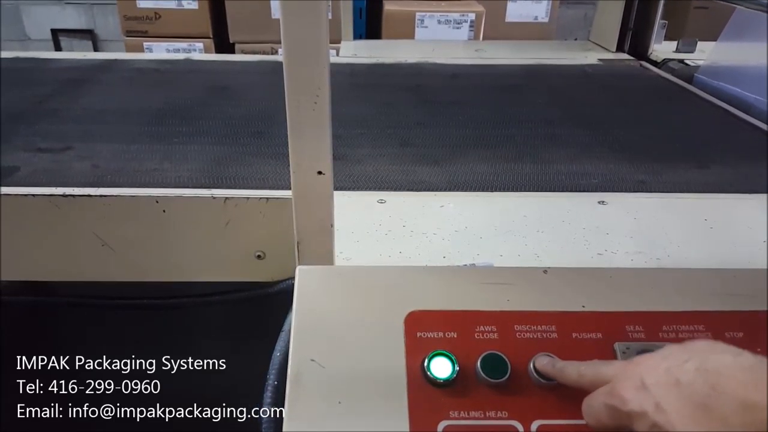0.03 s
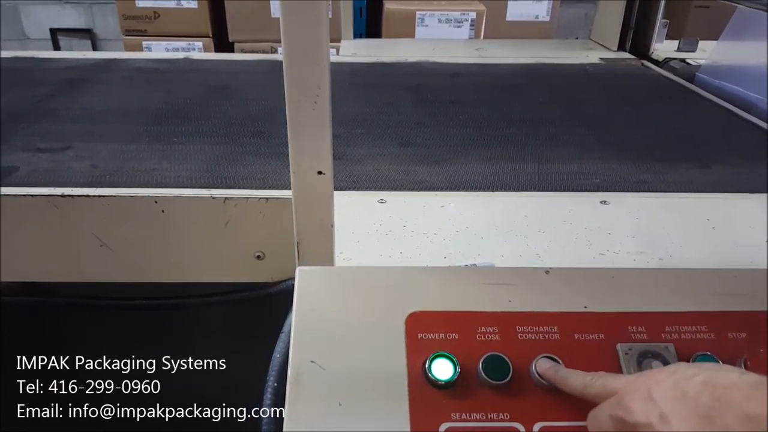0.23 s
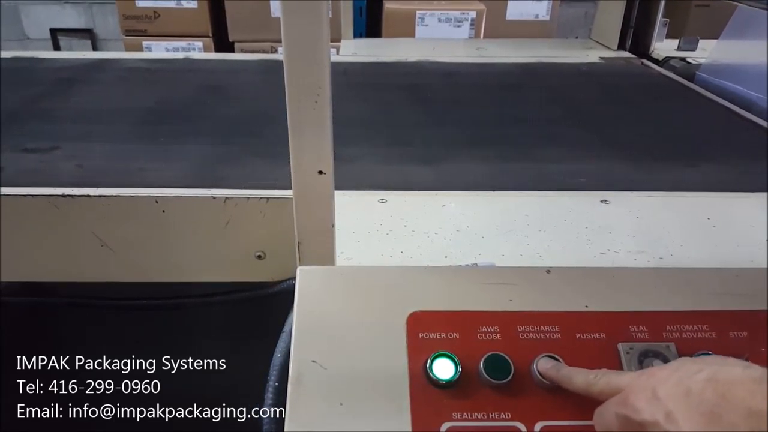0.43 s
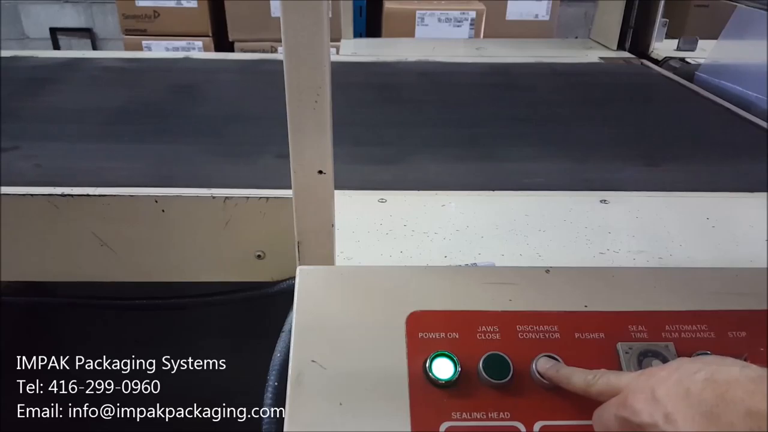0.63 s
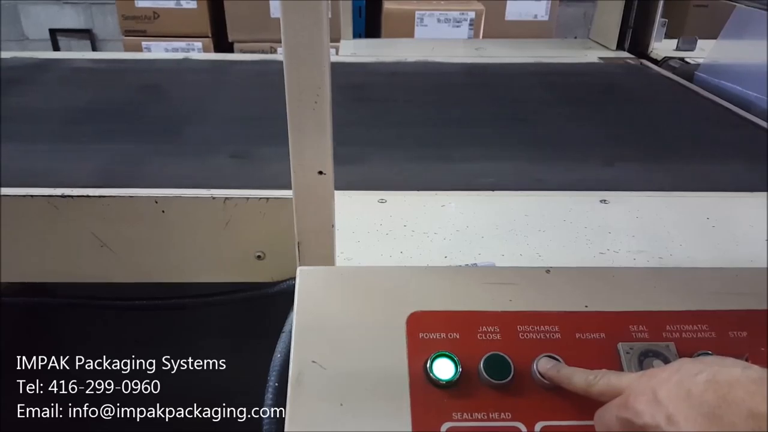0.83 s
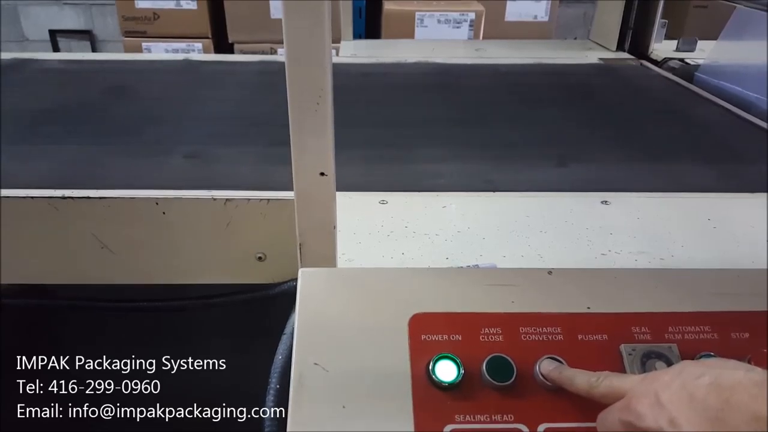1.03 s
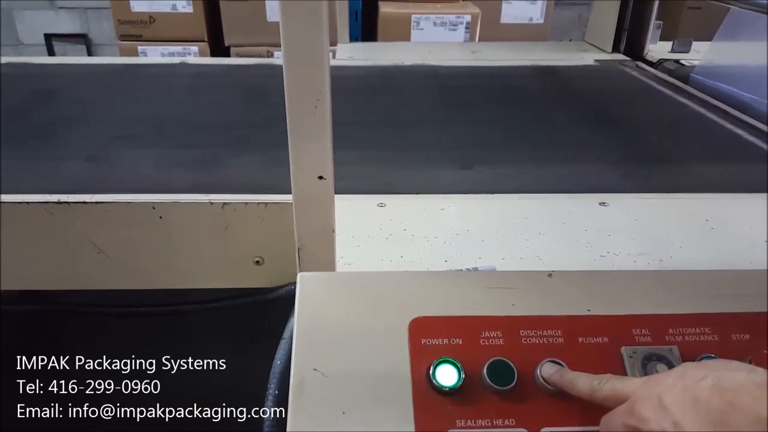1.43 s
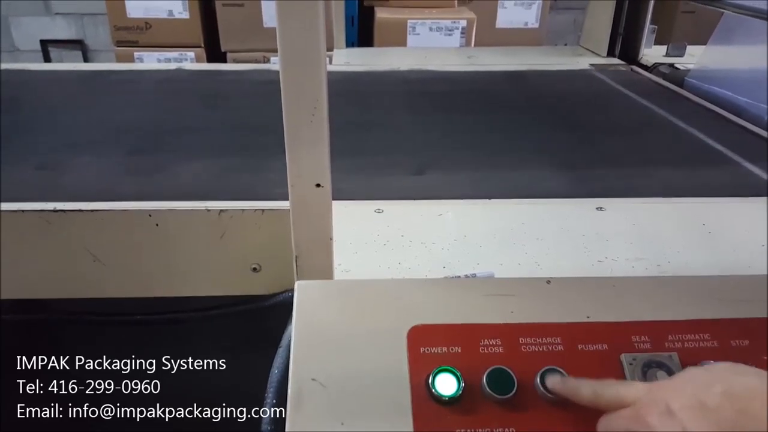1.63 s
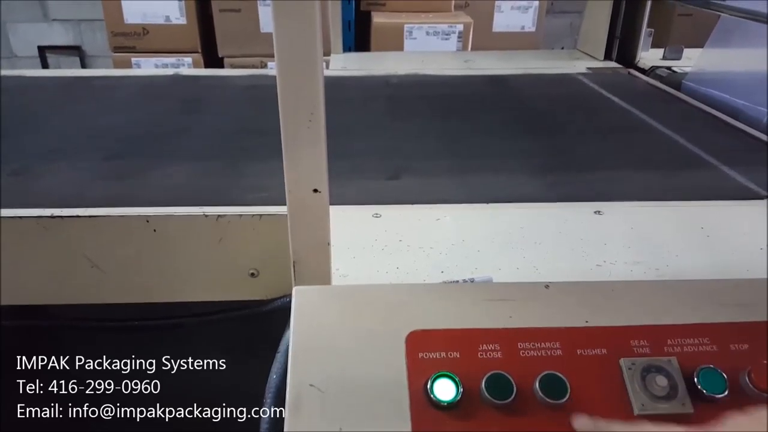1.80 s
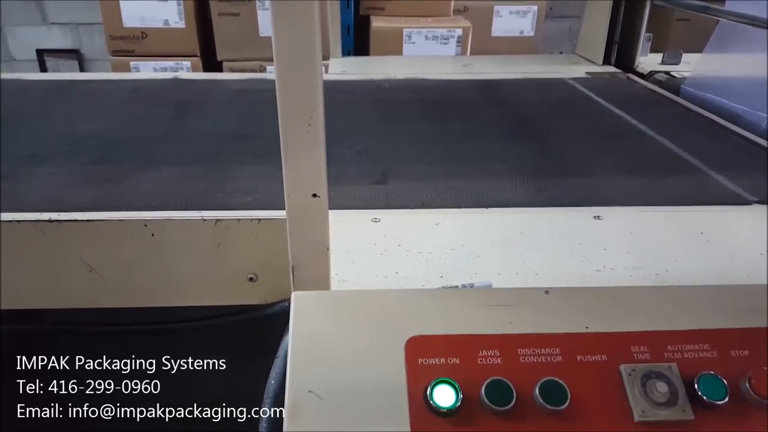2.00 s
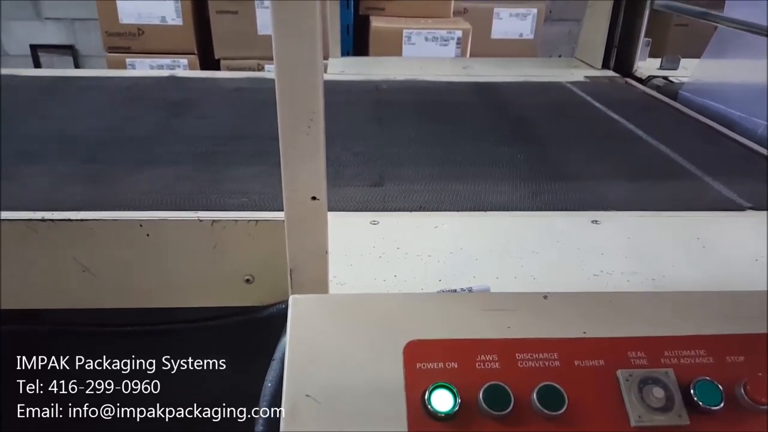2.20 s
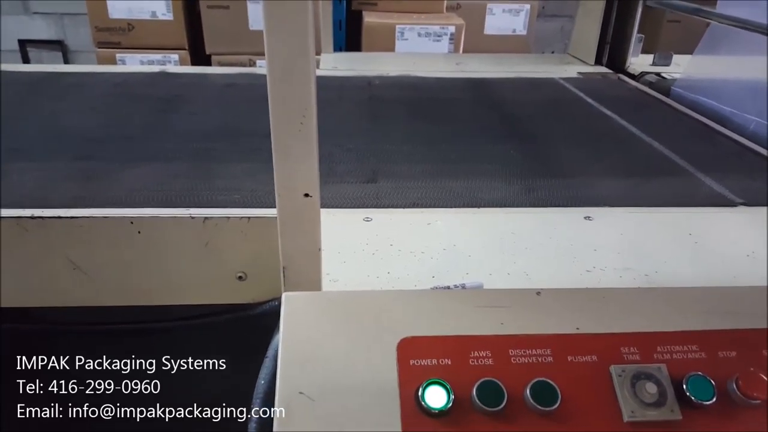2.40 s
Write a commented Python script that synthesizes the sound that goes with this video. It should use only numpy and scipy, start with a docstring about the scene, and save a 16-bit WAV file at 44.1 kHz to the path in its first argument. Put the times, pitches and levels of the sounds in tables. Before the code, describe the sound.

A conveyor belt runs briefly, slightly to the right, over steady workshop air noise and distant fans. At 0.2 seconds a switch thumps in a steel cabinet. From 0.4 the motor hums low and the belt rumbles, with faint gear whine, light repeated rubbing and a bump at 1.5. A second clicking thump at 1.65 cuts the power; the belt coasts with soft bumps, resting by 2.5.

```python
"""Belt conveyor, jogged once

A push button jogs a packaging machine's conveyor in a workshop with air noise and distant fans.
A contactor thumps in the steel cabinet, the motor hums, the gears whine, the belt rumbles and
rubs once per roller turn; a bearing squeals faintly. On release the cabinet thumps again and
the belt coasts to rest with a few soft bumps."""
import sys
import numpy as np
from scipy import signal
from scipy.io import wavfile

SR = 44100
rng = np.random.default_rng(int(sys.argv[2]) if len(sys.argv) > 2 else 0)


def int16_out(signal):
    """Quantize to a 16-bit WAV file."""
    q = np.round(np.clip(np.atleast_2d(signal).T, -1, 1) * 32767)
    wavfile.write(sys.argv[1], SR, q.astype(np.int16))


N = 112454
T = np.arange(N) / SR

# Noise spectra, shape only: f/Hz, density/dB
AIR_SPECTRUM = [(25, -3), (50, 6.5), (80, -4), (130, 1), (200, -1), (290, -18), (400, -12.5), (630, -18),
                (1000, -22), (1600, -23.5), (2500, -29), (4000, -36.5), (8000, -46), (14000, -39.5)]
HISS_SPECTRUM = [(3000, -3.5), (7000, -7), (10500, -9.5), (13000, -12.5), (15500, -3.5), (18000, 13)]
RATTLE_SPECTRUM = [(80, -25), (200, 9.5), (550, 5), (800, -7), (1400, -28.5), (3000, -24.5), (8000, -68)]
RUMBLE_SPECTRUM = [(25, -19), (45, -14.5), (65, 1.5), (90, -14), (125, -3.5), (200, -5.5), (280, -11),
                   (400, -24.5), (700, -42.5)]
ROLLING_SPECTRUM = [(200, -7.5), (400, -3), (620, -0.5), (760, -12), (1050, -5.5), (1500, -18.5),
                    (2300, -18), (2900, -25), (3400, -21.5), (4400, -23.5), (5600, -35.5), (8000, -66),
                    (14000, -34.5)]
RUB_SPECTRUM = [(700, -10), (1100, -5), (1500, -7), (1950, -4), (2550, 1), (3350, -13), (4400, -11),
                (6000, -20), (9000, -32)]
# Stereo images: f/Hz, L-R likeness, L minus R/dB
AIR_STEREO = [(30.5, 0, 23), (64, 0.59, -5), (117, 0.37, -3.5), (212, 0.99, -12), (710, 0.23, -6.5),
              (1400, 0.052, 5.5), (2480, 0, 2), (4900, 0, -1), (15000, 0.06, -0.5)]
MACHINE_STEREO = [(30, 0.057, -8), (70.4, 0.87, -4), (125, 1, -6.5), (325, 0.24, -13.5), (664, 0.073, -6.5),
                  (1280, 0.22, -2.5), (2520, 0, 3.5), (5030, 0.26, -2), (15000, 0.5, -2)]
ROLLER_STEREO = [(614, 0.5, -7.5), (1340, 0.065, -28.5), (2580, 0.32, 2), (4800, 1, 4.5), (12000, .1, -17)]
# Distant fans: f/Hz, width/Hz, level/dB
FAN_TONES = [(118, 9, -68.5), (193, 8, -65), (241, 6, -77), (398, 8, -82), (577, 8, -84)]
# Contactor closes, settles, opens:
# t/s, thump/dB, rattle/dB, click delay/s, click/dB, click f/Hz, click t60/s
SWITCHINGS = [(0.2072, -29.5, -45, 0.0053, -59, 1190, 0.15), (0.316, -47.5, -70, 0.004, -76, 990, 0.037),
              (1.649, -33.5, -53, 0.009, -55.5, 1400, 0.46)]
# Cabinet modes: f/Hz, level re thump/dB, t60/s
CABINET_MODES = [(108, -9, 0.4), (146.3, -11, 0.46), (204.5, -11, 0.4), (243.5, -3, 0.14), (325, -10, 0.38),
                 (352.6, -5.5, 0.21), (369.1, -1.5, 0.24), (429.4, -18, 0.2), (541, -25, 0.57),
                 (590.6, -19, 0.21), (663, -22.5, 0.12)]
# Contact click: multiple of click f, relative density/dB
CLICK_SPECTRUM = [(.4, -20), (.7, -8), (1, 0), (1.25, -12), (1.6, -20), (2.5, -15), (4, -30), (8, -58)]
# Motor hum, strongest pulling away: t/s, level/dB
HUM_ENVELOPE = [(0.38, -70), (0.405, -49.5), (0.49, -38), (0.63, -39), (0.77, -46), (1.0, -42.5),
                (1.35, -45.5), (1.63, -45.5), (1.76, -51), (1.97, -56), (2.1, -62)]
# Hum overtones at full power: multiple of mains f, level/dB
HUM_OVERTONES = [(4, -51.5), (6, -69), (8, -75)]
# Belt drive and frame shake: t/s, gain/dB
DRIVE_ENVELOPE = [(0.22, -38), (0.42, -6), (0.555, -4.5), (0.585, 0), (0.87, 2.5), (1.2, 1.5), (1.52, 3),
                  (1.68, 1.5), (1.82, -4), (2.0, -9), (2.3, -21), (2.55, -37)]
SHAKE_ENVELOPE = [(0.25, -32), (0.42, -7), (0.62, -6), (0.75, -4), (0.88, -3), (1.05, -5.5), (1.3, -1),
                  (1.62, -2.5), (1.82, -5), (2.0, -15.5), (2.3, -18.5), (2.55, -23.5)]
# Frame, gear and roller resonances: f/Hz, width/Hz, level before envelope/dB
FRAME_MODES = [(62.7, 4.5, -62), (84.7, 8.5, -51), (98.4, 7.3, -47.5), (193.3, 13, -55)]
GEAR_TONES = [(662, 9, -73), (848, 7, -77), (949, 9, -80), (1239, 12, -84), (1299, 12, -83),
              (1619, 12, -88), (1740, 10, -85), (2175, 12, -85), (2229, 14, -83.5), (2380, 12, -86),
              (2631, 9, -83)]
ROLLER_MODES = [(1740, 110, -15), (2230, 100, -9.5), (2400, 140, -11), (2640, 100, -7.5), (2860, 140, -11)]
# Belt catching on the roller: t/s, level/dB, t60/s
ROLLER_RUBS = [(.564, -62.5, .17), (.615, -62.5, .32), (.672, -59.5, .17), (.714, -65, .25),
               (.766, -64, .22), (.854, -59.5, .32), (.900, -64, .2), (.947, -64.5, .25),
               (1.037, -62.5, .15), (1.125, -63, .3), (1.220, -61.5, .2), (1.309, -58.5, .19),
               (1.400, -61.5, .25), (1.490, -57.5, .25), (1.572, -63, .18), (1.622, -66, .15)]
# Belt bumps in the frame: t/s, level/dB, width/s, f/Hz, overtone re bump/dB
BELT_BUMPS = [(.73, -42, .018, 88, -14), (.792, -41.5, .014, 88, -14), (.876, -41, .015, 88, -16),
              (1.357, -38, .014, 88, -18), (1.513, -32, .016, 88, -6), (1.975, -46, .016, 100, -11),
              (2.12, -45.5, .02, 88, -13)]
# Bearing squeal: t/s, level/dB
SQUEAL_ENVELOPE = [(0.85, -105), (1.08, -99), (1.14, -79.5), (1.2, -92), (1.28, -84), (1.45, -83.5),
                   (1.6, -89), (1.75, -104)]


def from_db(db):
    """Decibels to gain."""
    return 10 ** (np.asarray(db) / 20)


def unit_rms(x):
    """Scale to unit power."""
    return x / np.sqrt(np.mean(x ** 2) + 1e-20)


def curve(rows):
    """Line through (t/s, value) points."""
    return np.interp(T, *np.transpose(rows))


def at_hz(rows, hz):
    """Table columns interpolated over log f."""
    f_hz, *columns = np.transpose(rows)
    return [np.interp(np.log(hz), np.log(f_hz), column) for column in columns]


def pan(db):
    """L and R gains, db apart, mean one."""
    gains = from_db(np.array([[db], [-db]]) / 2)
    return gains / gains.mean()


def drift(rate_hz):
    """Low-passed random wander, about unit RMS."""
    hop, warmup = 40, 2000
    pole = np.exp(-2 * np.pi * rate_hz * hop / SR)
    white = rng.standard_normal(N // hop + warmup + 2)
    slow = signal.lfilter([1], [1, -2 * pole, pole * pole], white)[warmup:]
    return np.interp(np.arange(N) / hop, np.arange(len(slow)), unit_rms(slow))


def place(mid, side, image, hz):
    """Mix two independent signals to the stereo image at hz."""
    likeness, pan_db = at_hz(image, hz)
    likeness = np.clip(likeness, -.5, .99)
    spread = np.sqrt((1 - likeness) / (1 + likeness))
    return pan(pan_db) * (mid + spread * side * [[1], [-1]])


def noise(spectrum, image, flicker_db):
    """Stereo noise in independently flickering bands; unit mid power."""
    out = np.zeros((2, N))
    edges_hz = np.geomspace(22, 18000, 25)
    white = rng.standard_normal((2, 2, N))
    for k, (low, high) in enumerate(zip(edges_hz, edges_hz[1:])):
        hz = np.sqrt(low * high)
        wander_db = flicker_db * drift(12.2)
        if spectrum[0][0] / 2 < hz < spectrum[-1][0] * 2:
            bandpass = signal.butter(2, [low, high], "band", fs=SR, output="sos")
            mid, side = signal.sosfilt(bandpass, white[k % 2])
            out += from_db(at_hz(spectrum, hz)[0] + wander_db) * place(mid, side, image, hz)
    return out / np.sqrt(np.mean(out.mean(axis=0) ** 2))


def resonances(rows, image):
    """Narrow resonances under random excitation."""
    out = 0
    for hz, width_hz, db in rows:
        phase = 2 * np.pi * hz * T
        mid, side = [unit_rms(drift(width_hz * 0.57) * np.cos(phase)
                              + drift(width_hz * 0.69) * np.sin(phase)) for _ in range(2)]
        out += from_db(db) * place(mid, side, image, hz)
    return out


def struck(start_s, attack_s, t60_s):
    """Linear rise, exponential decay."""
    age_s = np.maximum(T - start_s, 0)
    return np.minimum(age_s / attack_s, 1) * from_db(-60 * age_s / t60_s)


def swell(centre_s, width_s):
    """Gaussian envelope."""
    return np.exp(-.5 * ((T - centre_s) / width_s) ** 2)


def workshop():
    """Steady air noise, distant fans, microphone hiss."""
    air = from_db(-59.5) * noise(AIR_SPECTRUM, AIR_STEREO, flicker_db=-1.0)
    fans = resonances(FAN_TONES, AIR_STEREO)
    hiss = from_db(-79) * noise(HISS_SPECTRUM, AIR_STEREO, flicker_db=1.5)
    return air + fans + hiss


def contactor():
    """Each switching rings the cabinet, clicks and rattles the panels."""
    thumps, clicks, rattle_gain = 0, 0, 0
    for t_s, thump_db, rattle_db, delay_s, click_db, click_hz, click_t60_s in SWITCHINGS:
        for hz, mode_db, t60_s in CABINET_MODES:
            ring = struck(t_s, attack_s=0.0064, t60_s=t60_s) * np.sin(2 * np.pi * hz * (T - t_s))
            thumps -= from_db(thump_db + mode_db) * ring
        spectrum = [(k * click_hz, db) for k, db in CLICK_SPECTRUM]
        click = noise(spectrum, MACHINE_STEREO, flicker_db=9.5)
        clicks += from_db(click_db) * struck(t_s + delay_s, attack_s=0.0031, t60_s=click_t60_s) * click
        rattle_gain += from_db(rattle_db) * struck(t_s, attack_s=0.014, t60_s=0.36)
    rattle = rattle_gain * noise(RATTLE_SPECTRUM, MACHINE_STEREO, flicker_db=1.5)
    return pan(db=-12.5) * thumps + clicks + rattle


def motor():
    """Magnetic hum at twice mains frequency; uneven throb under load, overtones while powered."""
    mains_hz, waver_db, waver_hz = 60, 1.1, 4
    on_s, rise_s, off_s, fall_db_per_s = 0.21, 0.51, 1.68, 86
    phase = 2 * np.pi * mains_hz * T
    powered = np.sqrt(np.clip((T - on_s) / rise_s, 0, 1))
    powered *= from_db(-fall_db_per_s * np.maximum(T - off_s, 0))
    load = np.minimum(from_db(curve(SHAKE_ENVELOPE)), 1)
    throb_hz = 13 * (1 + .2 * drift(7.2))
    throb_db = 2.6 * load * np.sin(2 * np.pi * np.cumsum(throb_hz) / SR)
    hum = from_db(curve(HUM_ENVELOPE) + waver_db * drift(waver_hz)) * np.sin(2 * phase)
    for k, db in HUM_OVERTONES:
        gain = powered * from_db(db + waver_db * drift(waver_hz))
        hum += gain * np.sin(round(k) * phase + rng.uniform(0, 2 * np.pi))
    return np.sqrt(2) * from_db(throb_db) * hum * pan(db=-10.5)


def belt():
    """The belt shakes the frame into a rumble; rolling noise follows the drive."""
    rumble = from_db(-46) * noise(RUMBLE_SPECTRUM, MACHINE_STEREO, flicker_db=3)
    rumble += resonances(FRAME_MODES, MACHINE_STEREO)
    rolling_db = -60.5 + 0.89 * curve(DRIVE_ENVELOPE)
    rolling = from_db(rolling_db) * noise(ROLLING_SPECTRUM, MACHINE_STEREO, flicker_db=1.35)
    return from_db(curve(SHAKE_ENVELOPE)) * rumble + rolling


def gears():
    """Whine at constant pitch; level follows the drive."""
    return from_db(0.9 * curve(DRIVE_ENVELOPE)) * resonances(GEAR_TONES, ROLLER_STEREO)


def roller():
    """Each rub of the belt hisses and rings the roller."""
    power = sum((from_db(db) * struck(t_s, attack_s=.012, t60_s=t60_s)) ** 2
                for t_s, db, t60_s in ROLLER_RUBS)
    ring = resonances(ROLLER_MODES, ROLLER_STEREO)
    hiss = from_db(-1.8) * noise(RUB_SPECTRUM, ROLLER_STEREO, flicker_db=0)
    return np.sqrt(power) * (ring + hiss)


def bumps():
    """Soft pushes of the belt swing the frame for a few cycles; the overtone leads."""
    overtone_hz, lead_s = 238.4, 0.0059
    out = 0
    for t_s, db, width_s, hz, overtone_db in BELT_BUMPS:
        swing = swell(t_s, width_s) * np.cos(2 * np.pi * hz * (T - t_s))
        overtone = swell(t_s - lead_s, width_s) * np.cos(2 * np.pi * overtone_hz * (T - t_s))
        out += from_db(db) * (swing + from_db(overtone_db) * overtone)
    return out * pan(db=-9.0)


def bearing():
    """Faint, rough squeal with the belt at speed."""
    roughness_hz = 55
    pitch_hz = 4842 + 15 * drift(roughness_hz)
    level_db = curve(SQUEAL_ENVELOPE) + 3.5 * drift(roughness_hz)
    return np.sqrt(2) * from_db(level_db) * np.sin(2 * np.pi * np.cumsum(pitch_hz) / SR)


def scene():
    """The machine in the workshop, louder on the right, reaching the left slightly earlier."""
    right_delay_s = 0.000407
    left, right = contactor() + motor() + belt() + gears() + roller() + bumps() + bearing()
    return workshop() + [left, np.interp(T - right_delay_s, T, right)]


def record(dry):
    """Steep elliptic low-pass."""
    cutoff_hz = 15800
    return signal.sosfilt(signal.ellip(12, .1, 80, cutoff_hz, fs=SR, output="sos"), dry)


dry = scene()
out = record(dry)
int16_out(out)
```